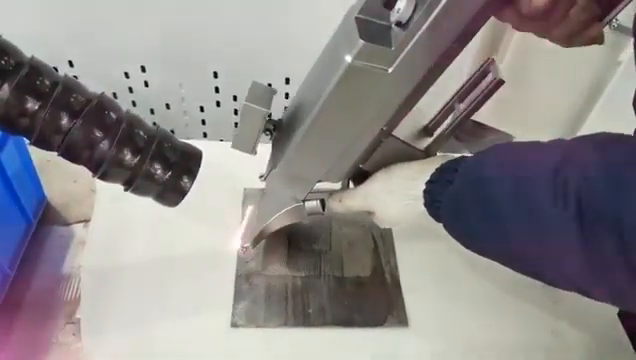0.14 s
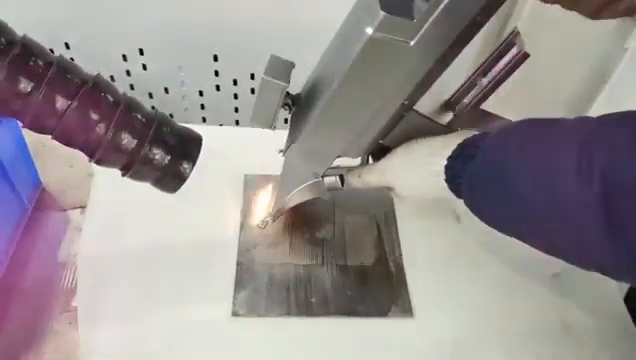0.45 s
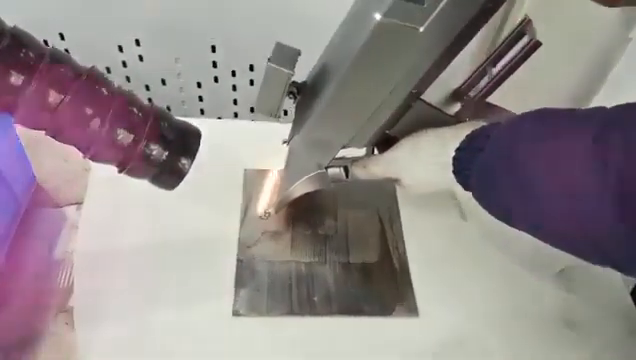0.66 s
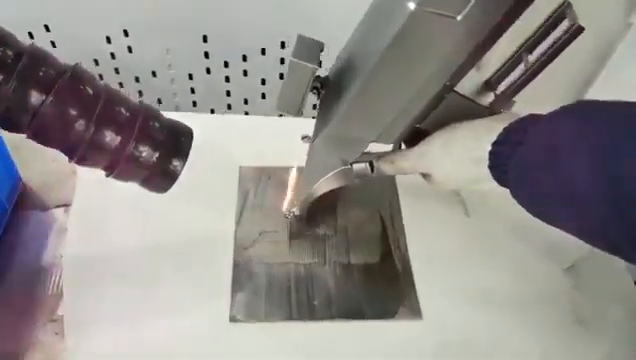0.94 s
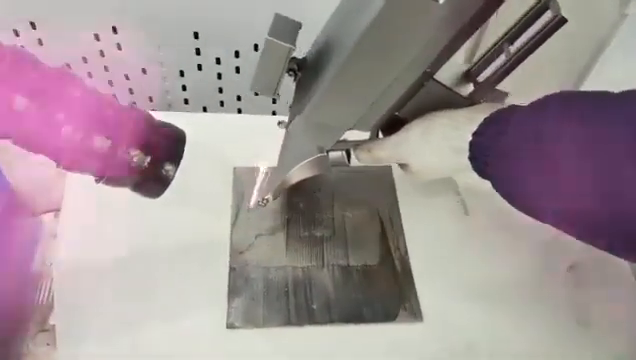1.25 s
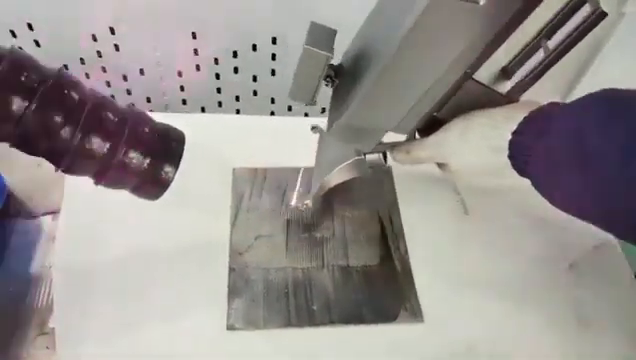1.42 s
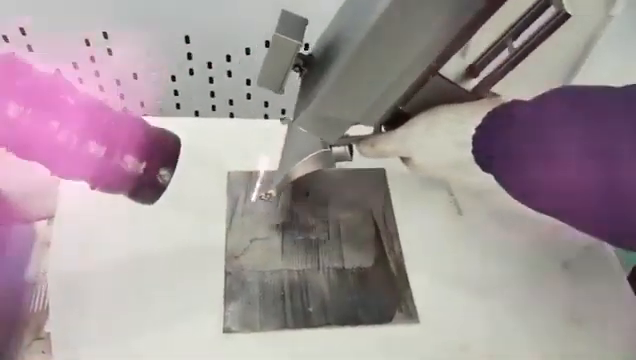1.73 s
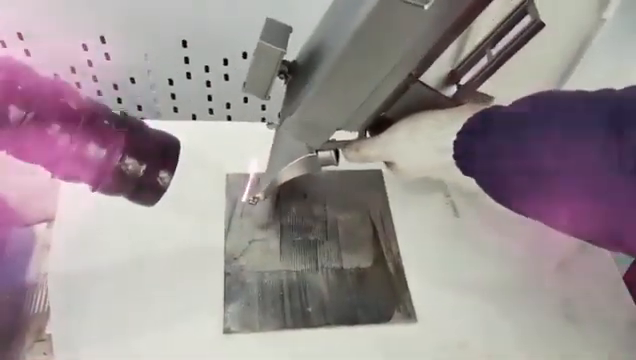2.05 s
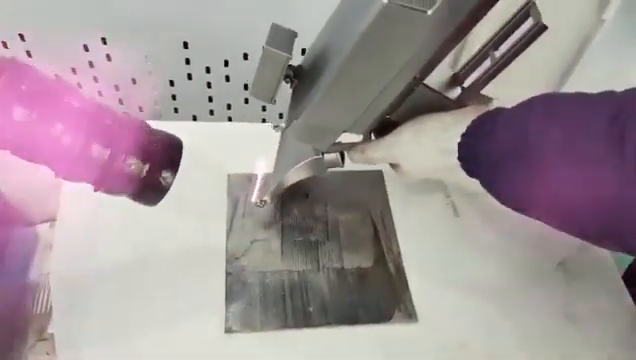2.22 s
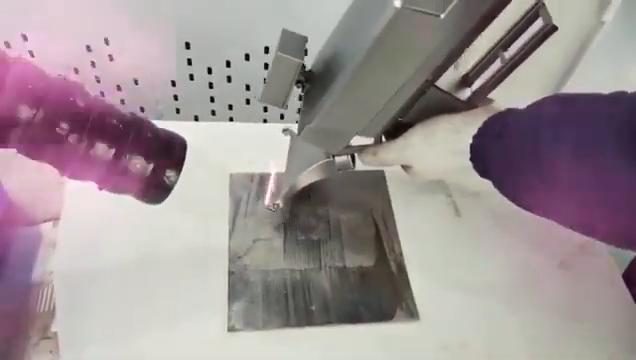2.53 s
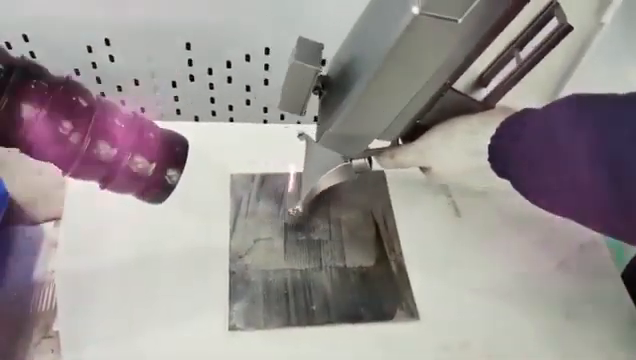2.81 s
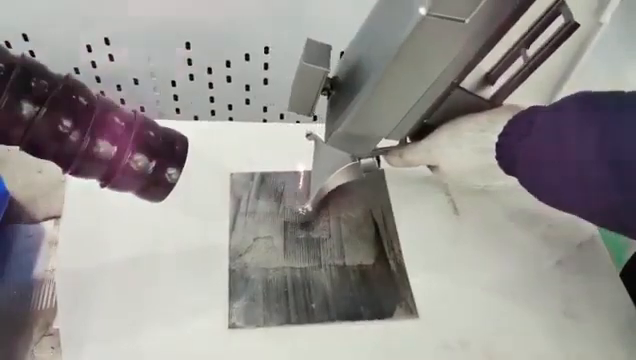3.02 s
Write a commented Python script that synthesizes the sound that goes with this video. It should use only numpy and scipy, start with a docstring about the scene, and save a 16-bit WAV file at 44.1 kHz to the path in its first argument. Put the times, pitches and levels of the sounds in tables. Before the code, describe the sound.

Close up at a workbench, a laser strips a metal plate with a bright, fluttering hiss, little spits and pops, and a light buzz. It fades briefly past halfway, then comes back, over an extractor fan's hum and rushing air.

```python
"""A handheld laser cleaner strips a steel plate close by, while an extractor fan hums throughout.
From the start its mirror buzzes, sweeping the beam to and fro, and the coating hisses and spits.
From 0.3 s some sweeps pop in the left microphone alone, probably glints off the plate. The tool's guide
rubs at 1.2 s. After 1.6 s the hiss sinks, and one of a few soft rumbles passes. Near 1.9 s the guide
rubs again, and the hiss returns with more spits and pops before thinning out after 2.7 s."""
import sys
import numpy as np
from scipy import signal
from scipy.fft import rfft, irfft, next_fast_len
from scipy.io import wavfile
from scipy.ndimage import uniform_filter1d, map_coordinates

SR = 44100
rng = np.random.default_rng(int(sys.argv[2]) if len(sys.argv) > 2 else 0)


def to_wav(sig):
    """Store sig (one row per channel, or 1-D mono) as 16-bit WAV at the path in sys.argv[1].

    Samples outside -1..1 are clipped; the rate is SR.
    """
    pcm = np.clip(np.atleast_2d(sig), -1, 1) * 32767
    pcm = np.round(pcm).astype(np.int16)
    wavfile.write(sys.argv[1], SR, pcm.T)  # frames by channels


N = 139797
T = np.arange(N) / SR
SWEEP_HZ = 67.2

# how hard the coating burns: (time [s], hiss level [dB], body level before stretching [dB])
BURN_LEVELS = [(0.0, -36.5, -38), (0.04, -34.5, -47.5), (0.15, -40.5, -45.5), (0.23, -31, -41),
               (0.305, -29.5, -39), (0.318, -26.5, -35), (0.41, -28, -29.5), (0.465, -35.5, -41),
               (0.53, -29.5, -34.5), (0.6, -33, -39), (0.66, -33, -33.5), (0.77, -37.5, -35),
               (0.82, -40.5, -39.5), (0.91, -32.5, -34.5), (0.96, -32, -44), (1.025, -34, -34),
               (1.05, -44.5, -47), (1.12, -57.5, -39), (1.19, -34.5, -43.5), (1.31, -38, -41.5),
               (1.39, -48.5, -53), (1.45, -39, -34), (1.52, -42, -44), (1.545, -37.5, -41),
               (1.6, -49.5, -63), (1.91, -54, -39.5), (1.97, -37.5, -56), (2.21, -38.5, -57),
               (2.32, -32.5, -53), (2.42, -32, -44), (2.58, -46, -45.5), (2.64, -35, -49), (2.74, -53, -71),
               (2.8, -51, -35.5), (2.92, -60, -35), (3.17, -42, -45)]
# tone colour of the bright hiss, then of its lower body: (frequency [Hz], level [dB])
HISS_COLOUR = [(300, -28), (1000, -23), (2250, -10), (2600, -7), (3100, -4), (3350, -3.5), (3650, -2),
               (4300, 4), (4700, 2.5), (5350, 0.5), (5800, -1.5), (6300, 1), (6850, 1), (7150, 1.5),
               (7600, -0.5)]
BODY_COLOUR = [(200, -8.5), (600, -14), (1000, -0.5), (1600, -8), (2000, 1.5), (2400, 2), (3050, 5.5),
               (3500, 6), (7600, -20)]
# flutter of the hiss: (time [s], once-a-sweep depth [dB], twice-a-sweep depth before scaling [dB])
FLUTTER_DEPTHS = [(0, 3, 3.5), (.8, -2.5, 2.5), (1.3, -0.5, 3), (1.9, 4, 7), (2.25, 0.5, -9),
                  (2.7, 2.5, 2.5)]
# a narrow ringing in the hiss: (time [s], level against the hiss level [dB])
RING_LEVEL = [(1.9, -20), (2.25, -6), (2.46, -9), (2.6, -10)]
# flakes bursting off: (time [s], level [dB], length [s], left minus right [dB])
FLAKE_BURSTS = [(.312, -28, .02, 0), (1.1265, -24.5, .009, 0), (1.1425, -24.5, .006, 0),
                (1.275, -25.5, .005, 0), (1.357, -32, .006, 0), (1.4895, -22.5, .007, -2),
                (2.073, -29.5, .014, 1), (2.236, -24.5, .006, 1), (2.266, -30, .005, 6),
                (2.281, -30, .006, 7), (2.361, -31, .016, 0), (2.414, -29.5, .006, 8),
                (2.618, -33.5, .018, 0), (2.648, -31, .014, 3)]
# tone colour of a burst: (frequency [Hz], level [dB])
SPIT_COLOUR = [(300, -22), (2200, -13), (3400, -8), (4400, 1), (5600, -3), (7500, 1), (8200, -60)]
# single pops: (time [s], strength [dB], width [ms])
SINGLE_POPS = [(0.393, -18, 0.42), (0.4094, -10.5, 0.26), (0.8818, -12, 0.4), (.897, -12, 0.65),
               (0.9096, -11, 0.22), (0.9253, -13, 0.5), (0.9274, -13, 0.24), (0.9406, -14, 0.35),
               (.942, -13, 0.18), (0.951, -18, .45), (0.9559, -9.5, 0.55), (.9843, -18, .4),
               (1.2775, -17, 0.35), (1.2918, -14, 0.23), (1.301, -16, .25), (1.492, -13.5, 0.25),
               (1.5514, -4.3, 0.41), (1.5512, -15, 1.3), (1.5662, -12, 0.34), (2.415, -19.5, .4),
               (2.533, -13.5, 0.097), (2.638, -13.5, 0.17)]
# runs of small pops: (start [s], end [s], strength [dB])
GLINT_RUNS = [(0.303, .44, -22), (1.181, 1.59, -24.5), (2.222, 2.497, -27.5)]
# tones in the mirror's buzz: (multiple of the sweep rate, level [dB])
BUZZ_TONES = [(6, -50), (16, -56), (18, -50.5), (20, -51), (22, -59), (24, -52), (26, -58), (33, -60),
              (40, -61)]
# how the buzz swells and fades: (time [s], gain [dB])
BUZZ_GAIN = [(0, -11), (.6, -14), (1.3, -5), (1.85, 1), (2.1, -6), (3.1, -1.5)]
# where the buzz sits: (frequency [Hz], left minus right [dB])
BUZZ_SIDE = [(1100, -5), (1600, 7.5), (2300, -6.5), (2700, 0.5)]
# rubs of the guide: (time [s], level [dB], half length [s], pitch [Hz], left minus right [dB])
GUIDE_RUBS = [(1.2, -39, .03, 1100, -1), (1.925, -34, .032, 1530, 6)]
# soft rumbles: (time [s], level [dB], half length [s])
LOW_RUMBLES = [(0.233, -38, 0.042), (1.19, -37, 0.034), (1.436, -33.5, 0.049), (1.82, -37, 0.067)]
# how loud the fan hums: (time [s], level [dB])
FAN_LEVEL = [(0.0, -36.5), (0.25, -36), (0.57, -46), (0.91, -36), (1.08, -37.5), (1.19, -35.5),
             (1.62, -38.5), (1.77, -32.5), (1.84, -29), (1.91, -30), (1.97, -37.5), (2.14, -35),
             (2.25, -37.5), (2.69, -41), (2.81, -32), (2.85, -36), (3.05, -32.5), (3.17, -35)]
# pitches at which the duct rings: (frequency [Hz], width [Hz], level [dB])
DUCT_RESONANCES = [(74, 22, -6), (117, 28, -1.5), (155, 40, -7), (202, 26, -8.5), (243, 25, -9),
                   (298, 14, -7.5), (389, 30, -1.5), (426, 22, -5.5)]
# the fan's whine: (frequency [Hz], level [dB])
WHINE_TONES = [(1002, -56), (2336, -66), (2671, -63)]
# air rushing into the hose: (frequency [Hz], level [dB])
AIR_COLOUR = [(20, 0.5), (50, 6), (300, 9), (480, 2), (600, 1.5), (950, 6), (1400, 2), (2000, -3),
              (2700, -3), (3600, -7.5), (4700, -5.5), (5600, -12.5), (7600, -12)]
# where that air sits: (frequency [Hz], left minus right [dB])
AIR_BALANCE = [(150, -0.5), (1000, -4), (2000, -0.5), (4000, -7.5), (7500, -10.5)]
# how alike left and right are: (frequency [Hz], likeness [1 = same, 0 = unrelated])
HISS_LIKENESS = [(500, 0.37), (1000, -0.12), (2000, -0.0069), (4000, -0.14)]
HUM_LIKENESS = [(40, 0.35), (130, 1), (450, 0.75)]
AIR_LIKENESS = [(100, 1), (500, 0.93), (1000, 0), (2000, 0), (7000, 0.47)]


def hiss(bare_db=-50, typical_db=-34, body_stretch=1.45, ring_hz=2582):
    """The coating boils off, fluttering with the sweep; it dies away where the metal is already bare."""
    hiss_db, body_db = curves(BURN_LEVELS)
    once_db, twice_db = curves(FLUTTER_DEPTHS)
    sweep = 2 * np.pi * SWEEP_HZ * T + 2 * wobble(7)
    sweep_db = once_db * np.cos(sweep) + 0.35 * twice_db * np.cos(2 * sweep)
    each_side_db = 1.66 * np.array([wobble(90), wobble(90)])
    flicker_db = 1.03 * wobble(40.45) + 1.3 * wobble(500)
    flutter = unit(amp(sweep_db + flicker_db + each_side_db))
    burning = 1 / (1 + amp(2 * (bare_db - hiss_db)))  # closes as the hiss falls below bare_db
    noise = lambda colour: rush(colour, HISS_LIKENESS, patchy_db=1.9)
    top = amp(hiss_db + 8.5) * noise(shape(HISS_COLOUR))
    body = amp(typical_db + 2 + body_stretch * (body_db - typical_db)) * noise(shape(BODY_COLOUR))
    ring = amp(hiss_db + curves(RING_LEVEL)[0]) * noise(band(ring_hz, width_hz=120))
    side_db = -.3 + 0.027 * (hiss_db - typical_db)  # slightly right, nearer the centre when louder
    return burning * flutter * (top + body + ring) * pan(side_db)


def bench_bounce(sound, delay_ms=1.045, sway_ms=0.055, share=.45):
    """The hiss also bounces off the bench; the path sways with the hand, so the colour shifts."""
    late = lambda side: np.interp(T - (delay_ms + sway_ms * wobble(3)) / 1000, T, side)
    echo = np.array([late(side) for side in sound])
    return (sound + share * echo) / np.hypot(1, share)


def lulls(depth_db=-6, length_s=.011):
    """A gain that makes the hiss catch for a moment just before a flake bursts."""
    near = sum(bell(time - length_s / 2, length_s) for time, *_ in FLAKE_BURSTS)
    return amp(depth_db * np.minimum(near, 1))


def spits(attack_s=.0007):
    """Thicker flakes burst in sharp puffs of a few milliseconds."""
    level = np.zeros((2, N))
    for time, db, length, side_db in FLAKE_BURSTS:
        rise = 1 - np.exp(-np.maximum(T - time, 0) / attack_s)
        level += amp(db) * pan(side_db) * rise * bell(time, length)
    return level * rush(shape(SPIT_COLOUR), HISS_LIKENESS, patchy_db=2)


def pops(tip_db=-8, swing_hz=198.5, damping=1.9):
    """Each glint pushes the left microphone: a round bump with a sharp tip, then a swing below rest."""
    push = glints()
    for time, db, width_ms in SINGLE_POPS:
        distance = 2 * np.abs(T - time) / (width_ms / 1000)
        push += amp(db) * (np.exp(-distance ** 2) + amp(tip_db) * np.exp(-distance))
    swing_back = lambda hz: -hz ** 2 / (swing_hz ** 2 - hz ** 2 + 1j * damping * swing_hz * hz)
    return np.array([filtered(push, swing_back), np.zeros(N)])


def glints(scatter_db=5, dull_above_hz=250):
    """Runs of small, dull pushes of random size, one each sweep."""
    push = np.zeros(N)
    for start, end, db in GLINT_RUNS:
        at = (np.arange(start, end, 1 / SWEEP_HZ) * SR).astype(int)
        push[at] = amp(db + scatter_db * np.clip(rng.standard_normal(len(at)), -2, 2))
    return signal.lfilter([1], [1, -np.exp(-2 * np.pi * dull_above_hz / SR)], push)


def mirror():
    """The swinging mirror buzzes at whole multiples of its sweep rate."""
    buzz = sum(tone(k * SWEEP_HZ, db) * pan(along(BUZZ_SIDE, k * SWEEP_HZ)) for k, db in BUZZ_TONES)
    return buzz * amp(curves(BUZZ_GAIN)[0])


def guide_rubs(width_hz=330):
    """The tool's guide rubs briefly on the plate."""
    sound = np.zeros((2, N))
    for time, db, half_length, hz, side_db in GUIDE_RUBS:
        friction = rush(band(hz, width_hz), AIR_LIKENESS, patchy_db=-5.5)
        sound += amp(db) * bell(time, half_length) * pan(side_db) * friction
    return sound


def rumbles(centre_hz=115, width_hz=70):
    """Soft low rumbles, probably the hand and hose shifting."""
    level = sum(amp(db) * bell(time, half_length) for time, db, half_length in LOW_RUMBLES)
    return level * rush(band(centre_hz, width_hz), HUM_LIKENESS, patchy_db=0)


def fan(air_db=-39.5, air_follows=0.48):
    """The extractor's duct hums; rushing air and a faint whine partly follow the hum's level."""
    def duct(hz):
        peaks = (amp(db) * hz * width / (centre ** 2 - hz ** 2 + 1j * hz * width)
                 for centre, width, db in DUCT_RESONANCES)
        return np.sqrt(sum(np.abs(peak) ** 3 for peak in peaks))

    level_db, = curves(FAN_LEVEL)
    hum = amp(level_db - 1) * rush(duct, HUM_LIKENESS, patchy_db=-2.5)
    air = rush(shape(AIR_COLOUR), AIR_LIKENESS, patchy_db=3.5)
    air = filtered(air, lambda hz: pan(along(AIR_BALANCE, hz)))
    whine = sum(tone(hz, db) for hz, db in WHINE_TONES)
    swell = amp(air_follows * (level_db - level_db.mean()))
    return hum + swell * (amp(air_db) * air + whine)


def rush(colour, likeness, patchy_db):
    """Stereo noise of strength 1, with random louder and softer patches across pitch and time."""
    spectrum = signal.stft(rng.standard_normal((2, N)), nperseg=512)[2]
    patches = uniform_filter1d(rng.standard_normal(spectrum.shape), size=4, axis=1)
    patches = uniform_filter1d(patches, size=20, axis=2)
    pair = signal.istft(spectrum * amp(patchy_db * unit(patches)), nperseg=512)[1][:, :N]
    angle = lambda hz: np.arccos(np.clip(along(likeness, hz), -1, 1)) / 2  # 0 makes both sides the same
    mid, side = filtered(pair, lambda hz: colour(hz) * np.array([np.cos(angle(hz)), np.sin(angle(hz))]))
    return unit(np.array([mid + side, mid - side]))


def tone(hz, db, waver_db=1.8, drift_rad=.5):
    """A pure tone that wavers a little in level and phase at each microphone."""
    phase = 2 * np.pi * hz * T + rng.uniform(0, 2 * np.pi)
    one_side = lambda: amp(db + waver_db * wobble(4)) * np.sin(phase + drift_rad * wobble(4.32))
    return np.sqrt(2) * np.array([one_side(), one_side()])


def filtered(sound, response):
    """Turn each frequency up or down by response(hz)."""
    size = next_fast_len(N + SR // 2)
    return irfft(rfft(sound, size) * response(np.fft.rfftfreq(size, 1 / SR)), size)[..., :N]


def shape(points):
    """A filter response from (frequency [Hz], level [dB]) points."""
    return lambda hz: amp(along(points, hz))


def band(centre_hz, width_hz):
    """A filter response that keeps only the sound near one pitch."""
    return lambda hz: 1 / (1 + ((hz - centre_hz) / width_hz) ** 4)


def along(points, hz):
    """Read between (frequency [Hz], value) points, with octaves evenly spaced."""
    frequencies, values = np.transpose(points)
    return np.interp(np.log(hz + 1), np.log(frequencies + 1), values)


def curves(rows):
    """One value per sample for each column after the time."""
    times, *columns = np.transpose(rows)
    return [np.interp(T, times, column) for column in columns]


def bell(time, half_length):
    """A smooth rise to 1 and fall again around a moment."""
    return np.exp(-((T - time) / half_length) ** 2)


def wobble(rate):
    """A smooth curve through `rate` random points a second."""
    return map_coordinates(rng.standard_normal(1024), [T * rate], mode="wrap")


def pan(side_db):
    """Left and right gains; positive leans left."""
    return amp(np.array([[.5], [-.5]]) * side_db)


def amp(db):
    """Turn decibels into a gain to multiply by."""
    return 10 ** (np.asarray(db) / 20)


def unit(x):
    """Scale to an average strength (rms) of 1."""
    return x / np.sqrt(np.mean(x ** 2) + 1e-20)


def scene():
    """Tool and fan together."""
    return lulls() * bench_bounce(hiss()) + spits() + pops() + guide_rubs() + rumbles() + mirror() + fan()


def record(dry):
    """Cut away nearly all the treble above 7.6 kHz."""
    return filtered(dry, lambda hz: amp(np.interp(hz, [7560, 7720, 8700, 9000], [0, -32, -60, -120])))


dry = scene()
out = record(dry)
to_wav(out)
```